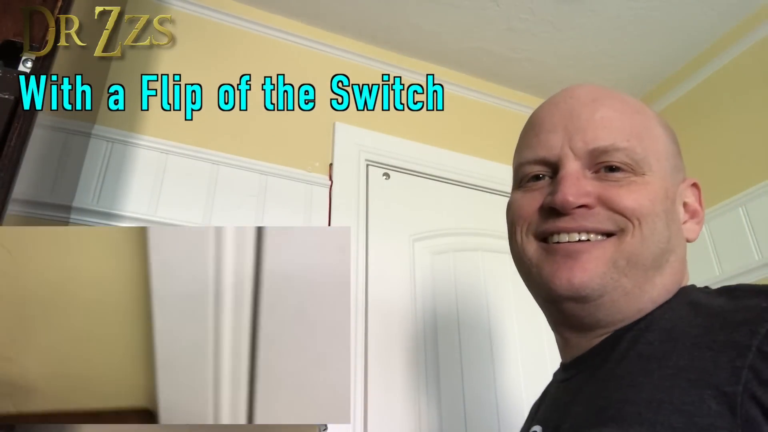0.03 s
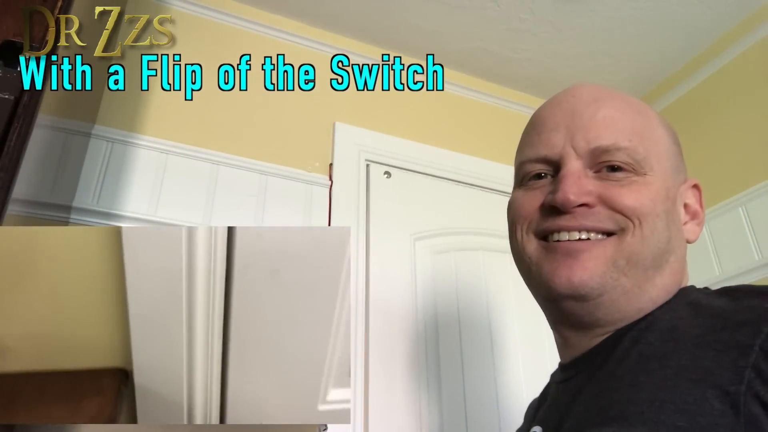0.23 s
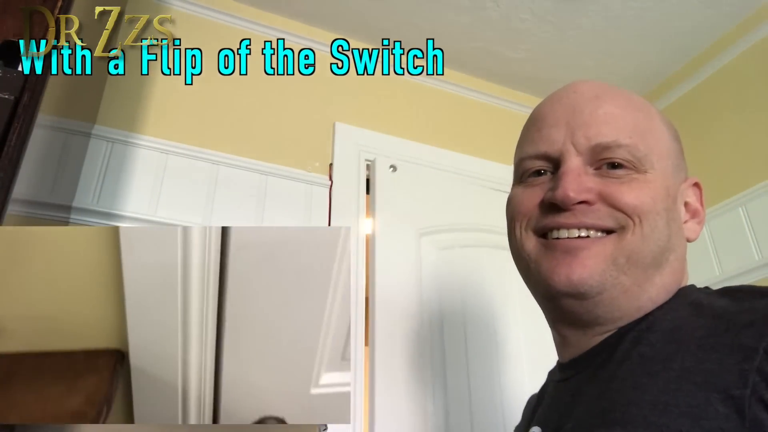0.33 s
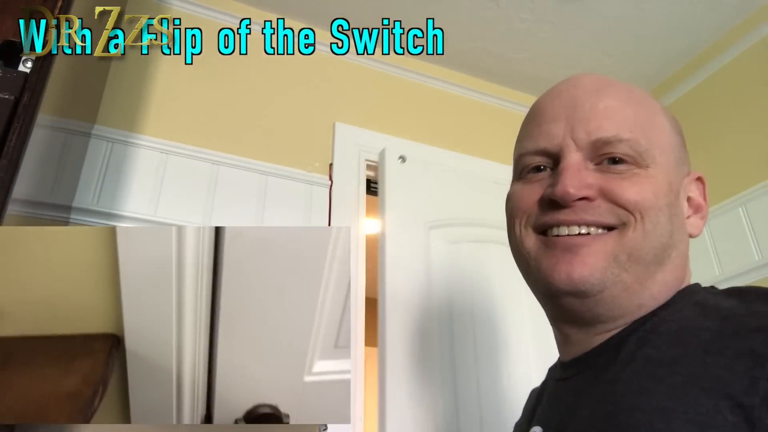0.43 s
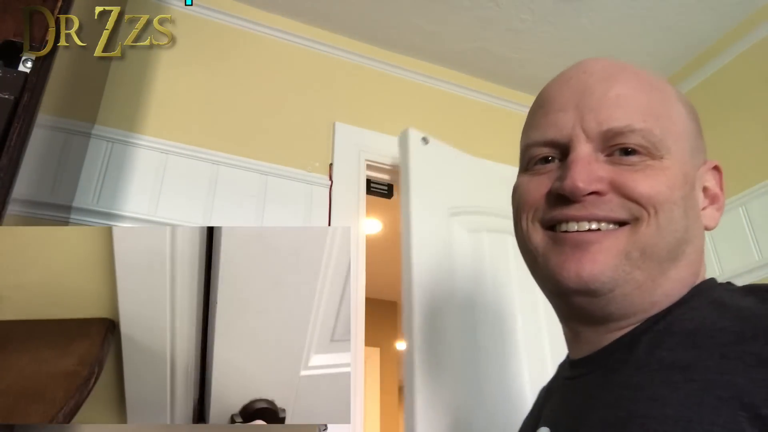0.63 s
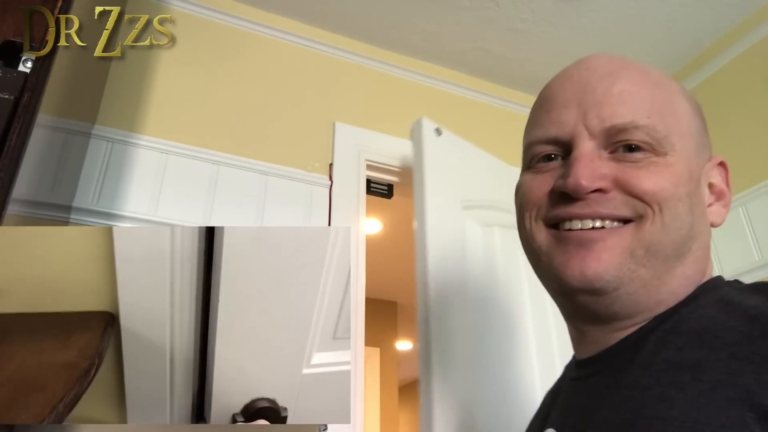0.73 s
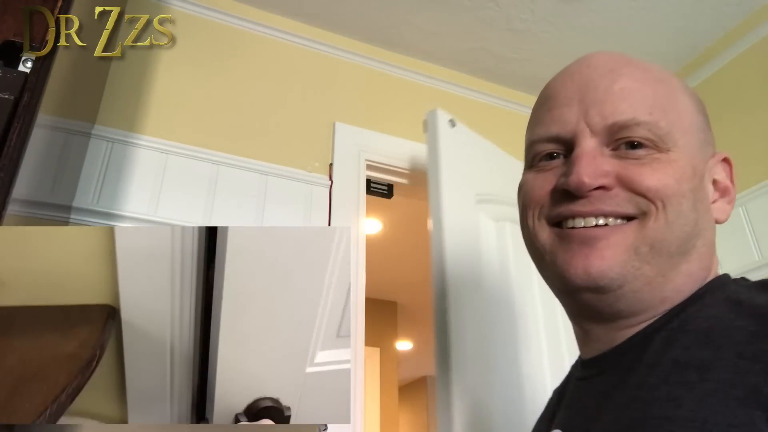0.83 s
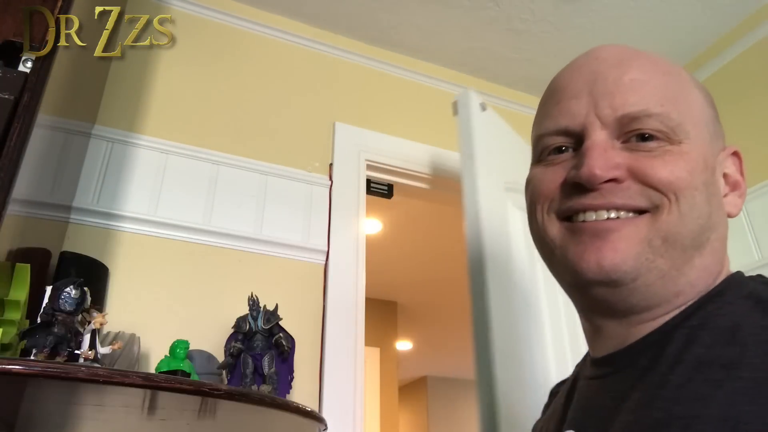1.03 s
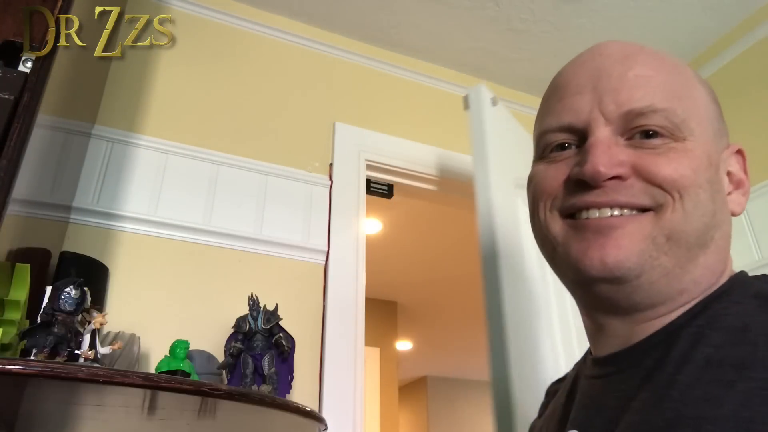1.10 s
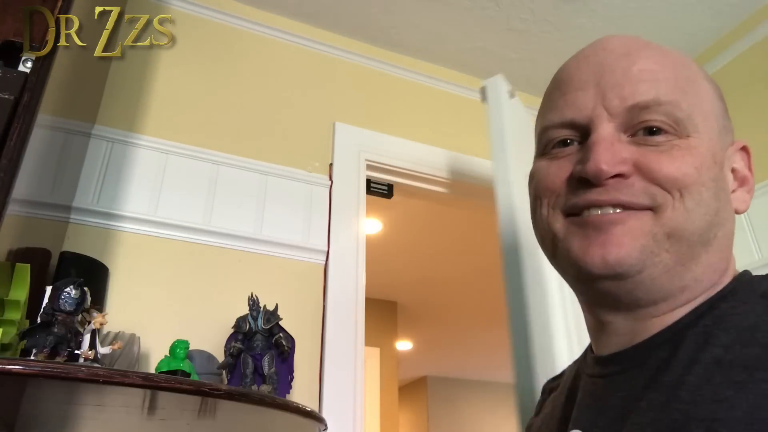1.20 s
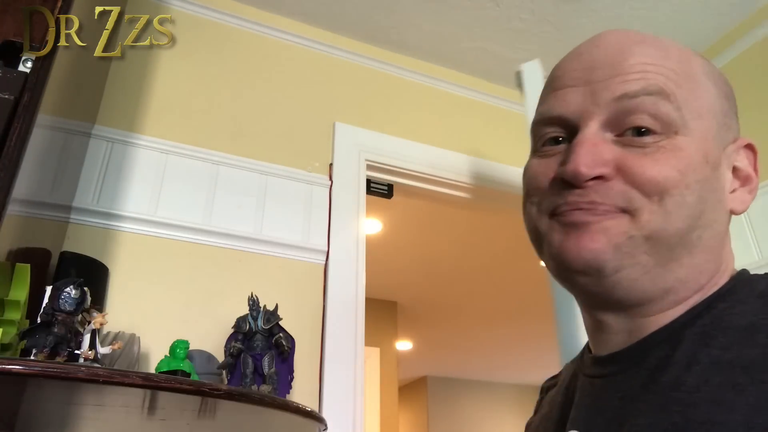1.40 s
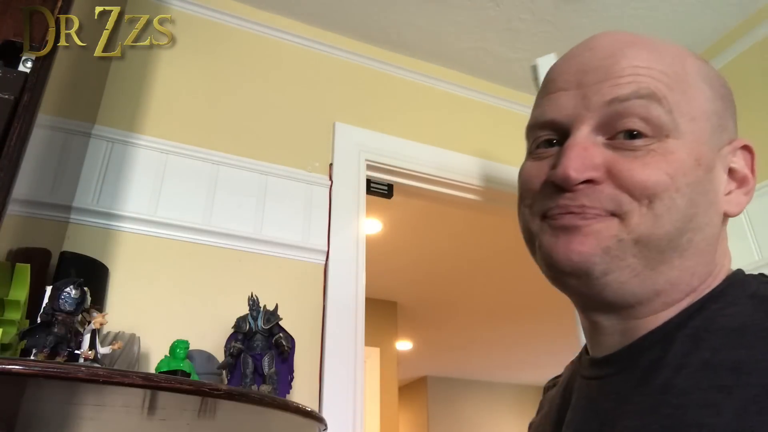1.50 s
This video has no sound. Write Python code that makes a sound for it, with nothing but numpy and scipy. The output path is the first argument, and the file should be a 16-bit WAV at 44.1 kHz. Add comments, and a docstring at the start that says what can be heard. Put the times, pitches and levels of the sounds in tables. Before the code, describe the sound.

An electric door lock lets go with one loud, abrupt metallic clunk, its ring cut short as the microphone overloads. The door swings open with a soft whirr, followed by faint bumps and light ticks in a small quiet room.

```python
"""An electric door lock lets go with a hard clunk in a small quiet room: its contacts crack, rattle
and set door and steel ringing. The door swings open with a soft whirr and pumps a slow wave of air
pressure that pins the microphone at its limit and chokes the clunk's ring.
A few soft bumps and light ticks follow over a faint steady hum."""
import sys
import numpy as np
from scipy import signal
from scipy.fft import rfft, irfft, next_fast_len
from scipy.io import wavfile

SR = 44100
rng = np.random.default_rng(int(sys.argv[2]) if len(sys.argv) > 2 else 0)


def output_pcm(signal):
    """Save a mono or channel-first signal as 16-bit PCM at the path in sys.argv[1].

    Samples are clipped to [-1, 1] before scaling.
    """
    pcm = np.clip(np.atleast_2d(signal).T, -1, 1) * 32767
    wavfile.write(sys.argv[1], SR, np.round(pcm).astype(np.int16))


N = 68355
T = np.arange(N) / SR

# ringing modes of the door and the steel lock, lowest first: f/Hz, level/dB, t60/s
MODES = [(167, -19, 0.182), (357.1, -16.5, 0.36), (436.3, -18, .16), (529.5, -13.5, 0.2), (690, -15, 0.158),
         (772.7, -10.5, 0.078), (895.3, -4.5, 0.06), (2234, -16.5, 0.078), (2862, -14.5, 0.182),
         (3596, -12, 0.061), (4051, -8.5, 0.074), (4932, -13, 0.092), (6000, -12, 0.064),
         (7697, -26, 0.0948), (8383, -18, .09), (8752, -11, 0.04)]
# bright noise colour of struck steel: f/Hz, level/dB
STEEL_COLOUR = [(200, -36), (900, -0.5), (1700, -4), (2600, -1), (3300, -5), (4800, -2.5), (7000, -5),
                (9000, -6), (11200, -6.5), (12000, -19)]


def amp(db):
    """Decibels to gain."""
    return 10 ** (np.asarray(db) / 20)


def unit(x):
    """Scale to rms 1."""
    return x / np.sqrt(np.mean(x ** 2) + 1e-20)


def along(points, hz):
    """Read a curve of (frequency, value) points on a log frequency axis."""
    freqs, values = np.transpose(points)
    return np.interp(np.log(hz + 1), np.log(freqs + 1), values)


def filtered(x, response):
    """Zero-phase EQ; response gives the gain at each frequency."""
    size = next_fast_len(N + SR // 2)
    return irfft(rfft(x, size) * response(np.fft.rfftfreq(size, 1 / SR)), size)[:N]


def noise(colour):
    """Noise of rms 1, shaped by an EQ curve."""
    return unit(filtered(rng.standard_normal(N), lambda hz: amp(along(colour, hz))))


def narrow_noise(centre_hz, width_hz):
    """A narrow noise band of rms 1 around a moving centre."""
    phase = 2 * np.pi * np.cumsum(centre_hz) / SR
    slow = lambda: filtered(rng.standard_normal(N), lambda hz: 1 / (1 + (hz / width_hz) ** 2))
    return unit(slow() * np.cos(phase) + slow() * np.sin(phase))


def strike(start, attack, t60):
    """Percussive envelope: quick rise, exponential fall; times in seconds."""
    age = np.maximum(T - start, 0)
    return (1 - np.exp(-age / attack)) * np.exp(-np.log(1000) * age / t60)


def room(x):
    """The small room's reverb, wet only; the treble dies first."""
    # reverb time: f/Hz, t60/s
    decay = [(150, 0.66), (700, 0.74), (2000, 0.536), (5000, 0.36), (11000, 0.34)]
    hz, t, spectrum = signal.stft(rng.standard_normal(SR), SR, nperseg=256)
    tail = signal.istft(spectrum * np.exp(-np.log(1000) * t / along(decay, hz)[:, None]), SR)[1]
    tail *= 1 - np.exp(-np.arange(len(tail)) / SR / 0.0019)  # reflections build up
    return signal.fftconvolve(x, tail / np.linalg.norm(tail))[:N]


def room_tone():
    """Dull air, a thin steady hum, and a faint hiss that dies away at the start."""
    # dark bed of room air: f/Hz, level/dB
    air_colour = [(15, 7.5), (60, 5), (120, -1.5), (220, -4.5), (285, -1), (390, -7), (520, -3.5),
                  (640, -10), (900, -7), (1400, -15.5), (2200, -25.5), (4000, -32.5), (8000, -33.5),
                  (11000, -32), (13000, -51)]
    # upper-mid hiss: f/Hz, level/dB
    hiss_colour = [(700, -40.5), (1600, 8.5), (2800, 3), (3800, -15.5), (8000, -22.5)]
    hum_hz = 810 + 1.3 * narrow_noise(np.zeros(N), width_hz=8.8)  # the pitch wavers slightly
    hum = np.sqrt(2) * np.sin(2 * np.pi * np.cumsum(hum_hz) / SR)
    hiss = strike(0, attack=0.00075, t60=0.352) * noise(hiss_colour)
    return amp(-62.5) * noise(air_colour) + amp(-76) * hum + amp(-72) * hiss


def rumble():
    """A low rumble that swells before the release and around the bumps."""
    # fader curve: t/s, level/dB
    swell = [(0, -65), (.06, -54.5), (.12, -52.5), (.165, -52.5), (.8, -68.5), (.95, -73), (1.14, -60),
             (1.21, -56.5), (1.33, -58), (1.42, -64), (1.55, -60.5)]
    # sub-bass colour: f/Hz, level/dB
    colour = [(10, -9), (30, -3), (60, -6), (100, -16), (150, -31.5), (300, -60)]
    return amp(np.interp(T, *np.transpose(swell))) * noise(colour)


def pressure_wave():
    """The door sucks and pushes the room's air, too slowly to be heard by itself."""
    # air pressure at the microphone: t/s, pressure/full scale
    pressure = [(.175, 0), (.255, -.17), (.295, -.115), (.345, -.085), (.375, 0), (.404, .33), (.44, .48),
                (.48, .31), (.499, .08), (.535, -.06), (.625, -.105), (.68, -.05), (.76, -.05), (.8, -.003),
                (.86, -.01), (.9, .017), (.985, .005), (1.045, .044), (1.12, 0), (1.21, -.012),
                (1.28, .009), (1.37, .016), (1.42, -.006)]
    window = np.hanning(SR // 50)  # rounds off the corners
    return signal.fftconvolve(np.interp(T, *np.transpose(pressure)), window / window.sum(), "same")


def bolt_scrapes():
    """The loaded bolt shifts in its keeper with faint dull scrapes before it lets go."""
    # shifts of the bolt: t/s, level/dB
    shifts = [(.285, -60), (.35, -60)]
    # mid-heavy scrape: f/Hz, level/dB
    colour = [(150, -18), (450, 5.5), (950, 6.5), (1400, -8.5), (2000, 0.5), (2550, 1.5), (3300, -7.5),
              (5500, -12), (11000, -21.5)]
    return sum(amp(db) * strike(start, attack=0.00075, t60=0.263) * noise(colour) for start, db in shifts)


def lock_clunk():
    """Each contact cracks, rattles the steel, thuds in the door and feeds the ring of both."""
    # the release and its rebounds: t/s, level/dB, crack trim/dB
    contacts = [(.3628, 0, 0), (.3686, -6, -5), (.39, -18, -6), (.397, -14, -6)]
    # the door's woody body: f/Hz, level/dB
    wood_colour = [(70, -31.5), (160, -1), (240, -3), (350, -0.5), (800, 1.5), (1200, -8.5), (2000, -12.5),
                   (4000, -43.5)]

    def blows(attack, t60):
        return sum(amp(db) * strike(start, attack, t60) for start, db, _ in contacts)

    crack = sum(amp(-25 + db + trim_db) * strike(start, attack=0.000457, t60=0.0116)
                for start, db, trim_db in contacts)
    rattle = amp(-33) * blows(attack=0.000457, t60=0.0836)
    ring = np.zeros(N)
    for hz, db, t60 in MODES:
        partial = np.sin(2 * np.pi * (hz * T + rng.random()))
        ring += amp(-32 + db) * blows(attack=0.00025, t60=t60) * partial
    steel = (crack + rattle) * noise(STEEL_COLOUR)
    thud = amp(-38) * blows(attack=0.0034, t60=0.161) * noise(wood_colour)
    reverb_send = amp(-15) * (steel + thud) + amp(-20) * ring
    return ring + steel + thud + room(reverb_send)


def door_swing():
    """The door's mechanism whirrs over a broad swish, fading as the door slows."""
    # path of the whirr: t/s, level/dB, centre f/Hz
    path = [(.42, -81.5, 1750), (.52, -66.5, 1830), (0.622, -72, 1840), (0.761, -71.5, 1865),
            (.92, -80.5, 1797), (1.168, -81.5, 1751), (1.299, -87.5, 1580)]
    # soft low-mid swish: f/Hz, level/dB
    swish_colour = [(100, -13), (300, 12.5), (1000, 6), (1500, 6), (2200, -3.5), (2800, -3.5),
                    (4000, -13.5), (8000, -41)]
    times, db, centre_hz = np.transpose(path)
    whirr = narrow_noise(np.interp(T, times, centre_hz), width_hz=106.3)
    swish = amp(2.5) * noise(swish_colour)
    return amp(np.interp(T, times, db, left=-120)) * (whirr + swish)


def door_bumps():
    """Dull bumps wake the door's lowest mode, each with a faint bright scuff."""
    # soft knocks of the door: t/s, bump level/dB, scuff level/dB
    hits = [(1.18, -62, -67), (1.201, -60.5, -74), (1.242, -64, -92), (1.352, -70.5, -72)]
    # bassy knock: f/Hz, level/dB
    colour = [(40, -16), (90, -0.5), (170, -9), (300, -6), (700, -13.5), (1500, -15.5), (3000, -34.5)]
    lowest_hz, attack_s = MODES[0][0], 0.00224
    out = np.zeros(N)
    for start, bump_db, scuff_db in hits:
        body = noise(colour) + amp(8.5) * np.sin(2 * np.pi * lowest_hz * (T - start))
        out += amp(bump_db) * strike(start, attack_s, t60=0.1505) * body
        out += amp(scuff_db) * strike(start, attack_s, t60=0.0873) * noise(STEEL_COLOUR)
    return out


def ticks():
    """Tiny bright clicks close by: one very short ring and a spray of noise."""
    # light sharp clicks: t/s, level/dB
    clicks = [(1.2585, -28), (1.3525, -53), (1.464, -55.5)]
    # crisp spray: f/Hz, level/dB
    colour = [(500, -30.5), (3000, 0), (6000, -31.5), (8000, 6), (9800, 2.5), (11000, 3), (12500, -13.5)]
    ring_hz, attack_s = 9770, 0.000202
    out = np.zeros(N)
    for start, db in clicks:
        ring = strike(start, attack_s, t60=0.001873) * np.sin(2 * np.pi * ring_hz * (T - start))
        spray = amp(-17) * strike(start, attack_s, t60=0.0039) * noise(colour)
        out += amp(db) * (ring + spray)
    return out + amp(-20) * room(out)


def scene():
    """Everything that reaches the microphone, in mono."""
    door = pressure_wave() + bolt_scrapes() + lock_clunk() + door_swing() + door_bumps()
    return (room_tone() + rumble() + door + ticks())[None]


def record(dry):
    """The microphone saturates under the pressure wave, muting all sound riding on it; then a high cut."""
    ceiling, knee_hardness, high_cut_hz = 0.332, 36, 12150
    x = dry[0]
    pinned = x / (1 + np.abs(x / ceiling) ** knee_hardness) ** (1 / knee_hardness)
    return filtered(pinned, lambda hz: 1 / (1 + (hz / high_cut_hz) ** 80))[None]


dry = scene()
out = record(dry)
output_pcm(out)
```